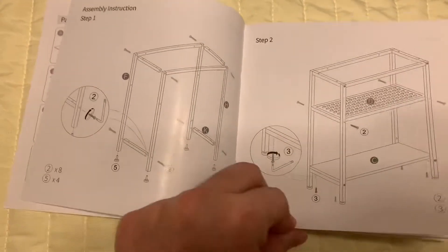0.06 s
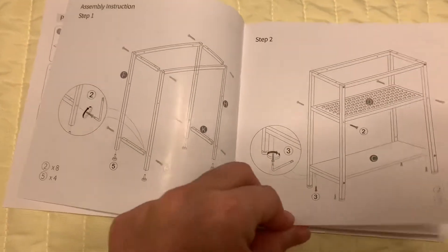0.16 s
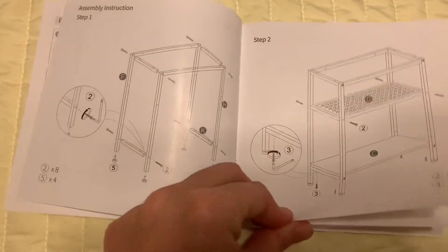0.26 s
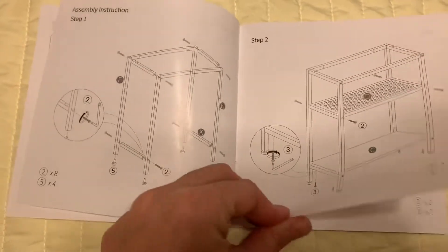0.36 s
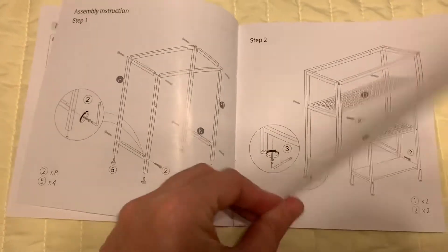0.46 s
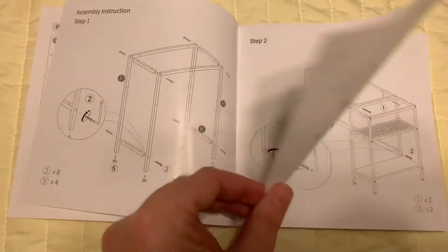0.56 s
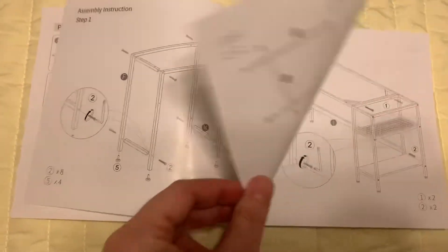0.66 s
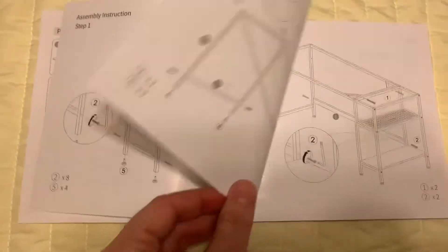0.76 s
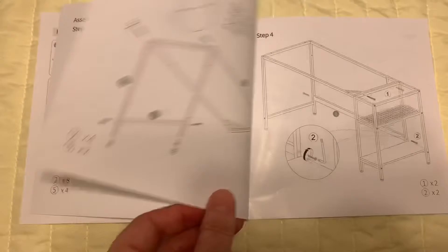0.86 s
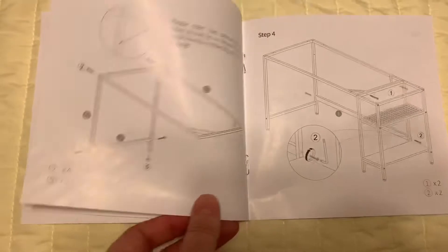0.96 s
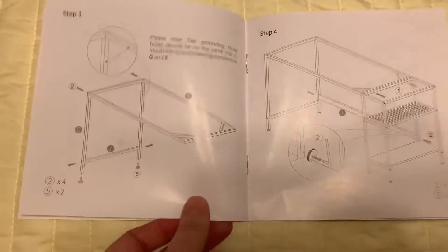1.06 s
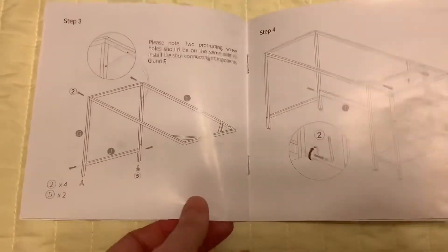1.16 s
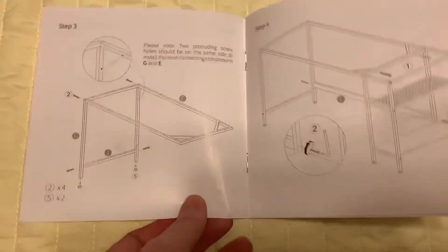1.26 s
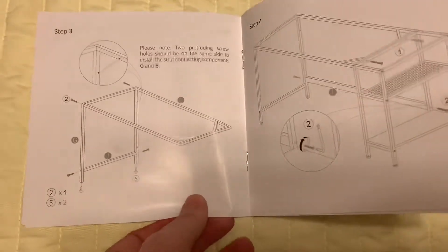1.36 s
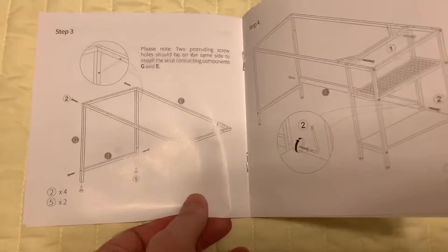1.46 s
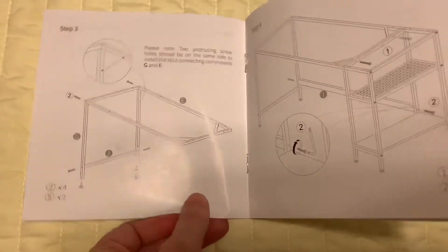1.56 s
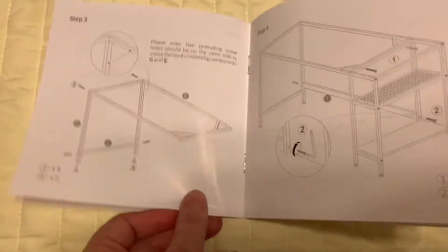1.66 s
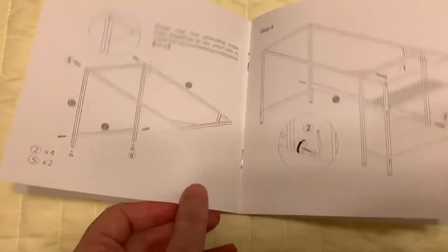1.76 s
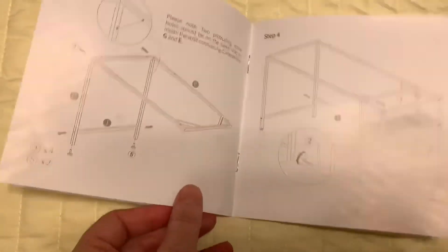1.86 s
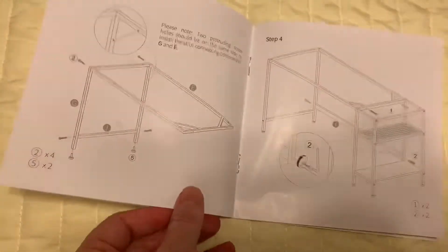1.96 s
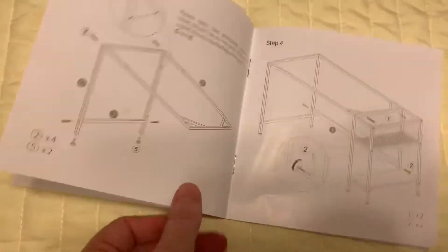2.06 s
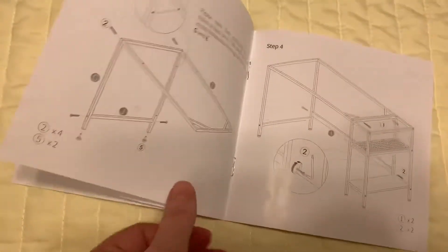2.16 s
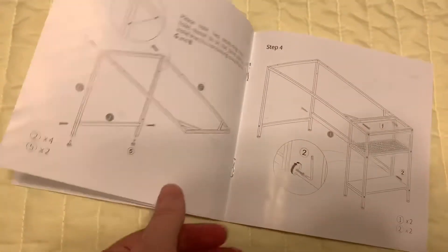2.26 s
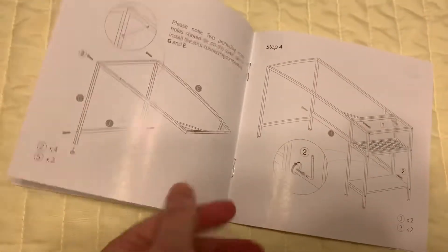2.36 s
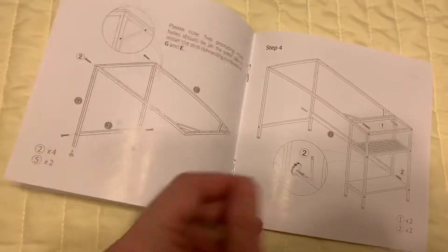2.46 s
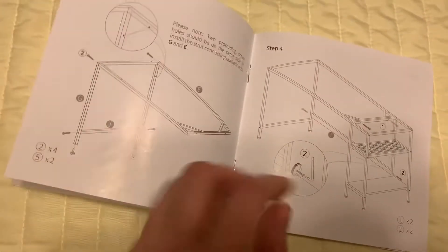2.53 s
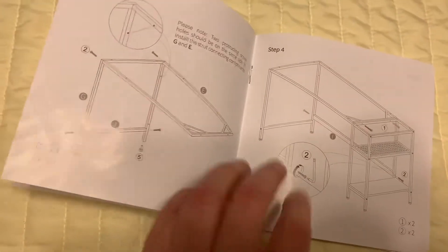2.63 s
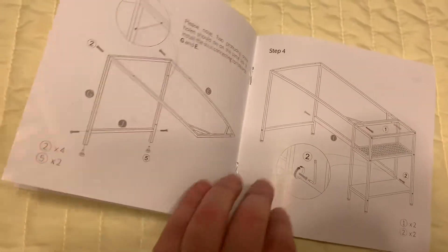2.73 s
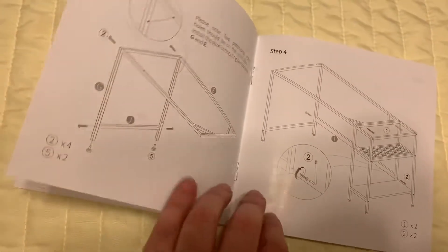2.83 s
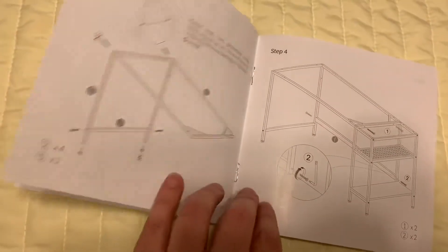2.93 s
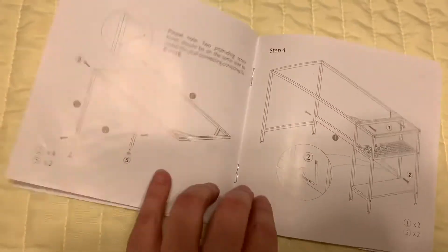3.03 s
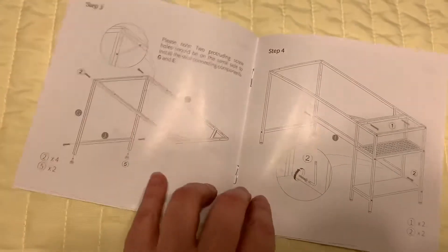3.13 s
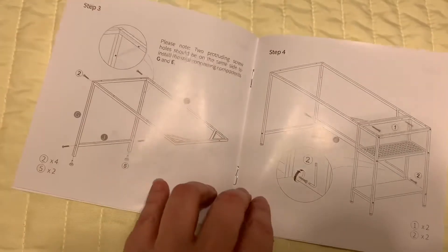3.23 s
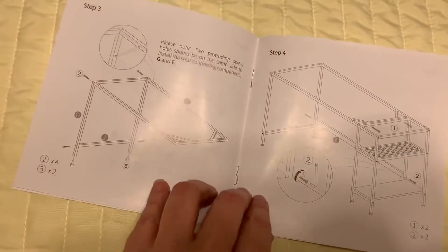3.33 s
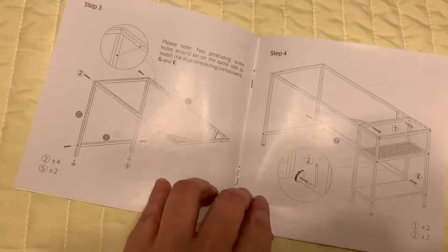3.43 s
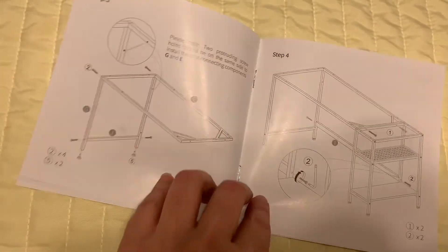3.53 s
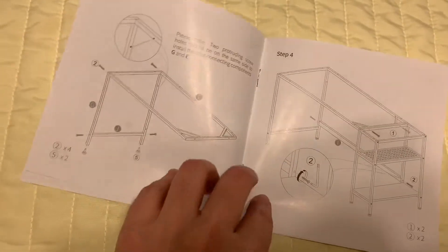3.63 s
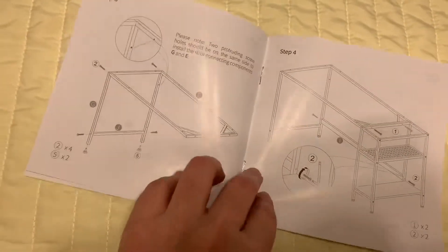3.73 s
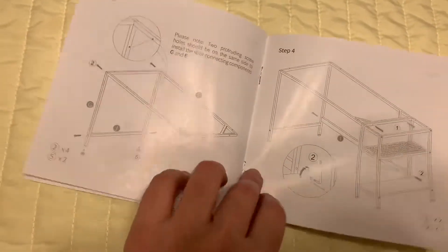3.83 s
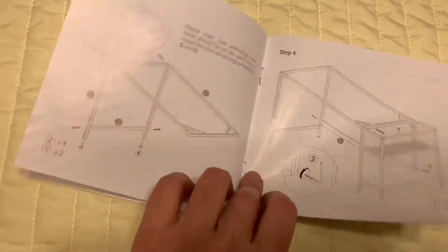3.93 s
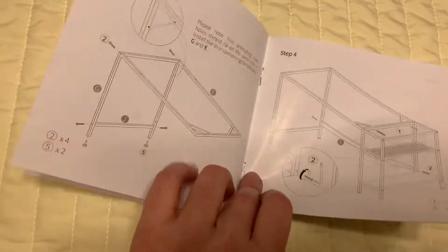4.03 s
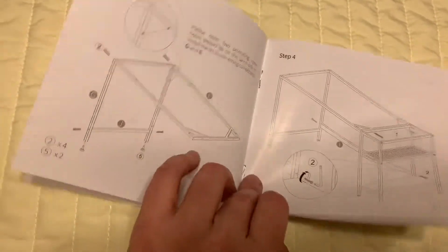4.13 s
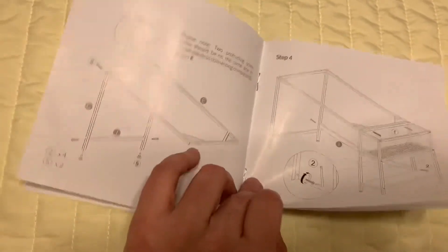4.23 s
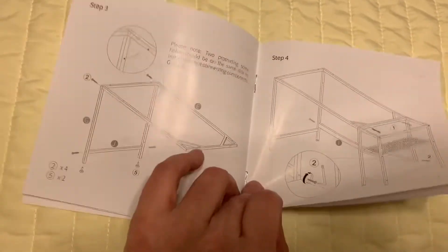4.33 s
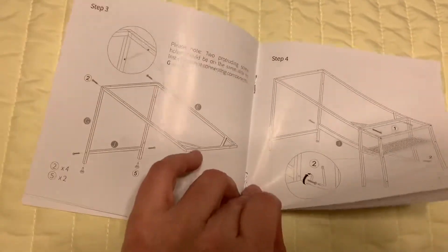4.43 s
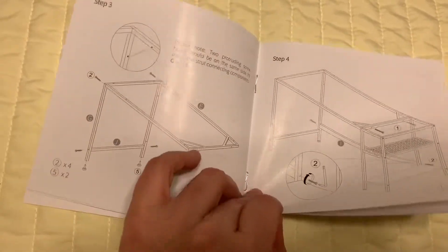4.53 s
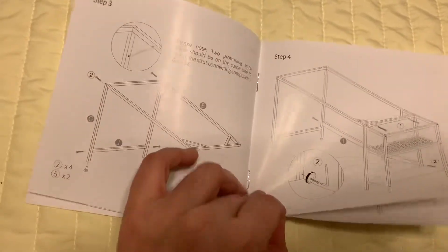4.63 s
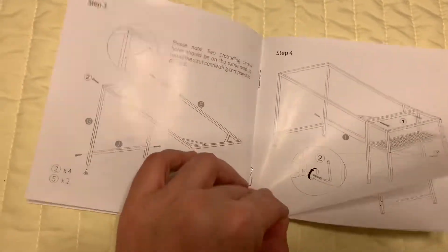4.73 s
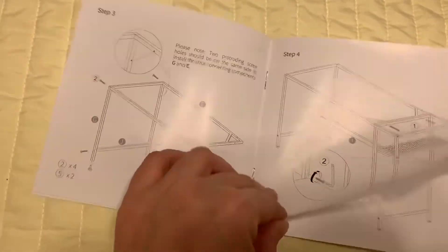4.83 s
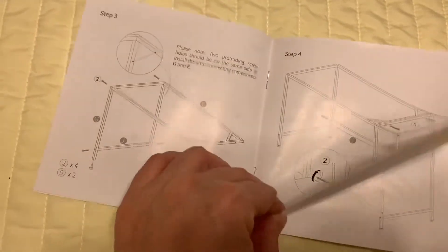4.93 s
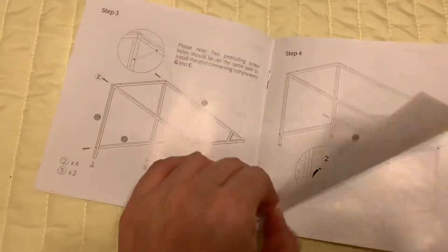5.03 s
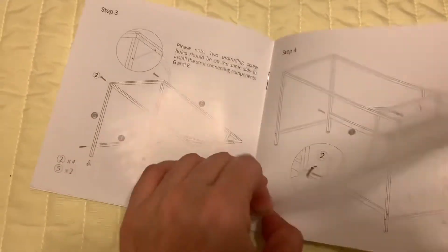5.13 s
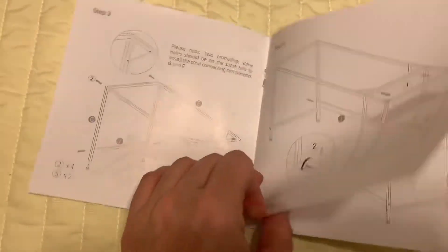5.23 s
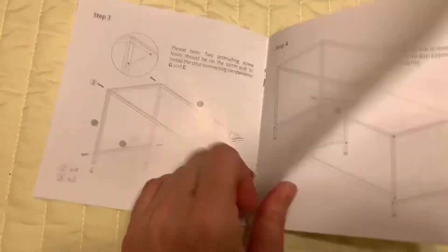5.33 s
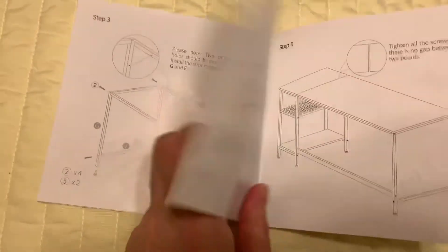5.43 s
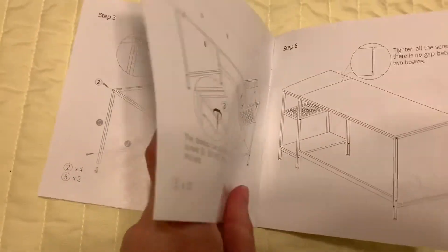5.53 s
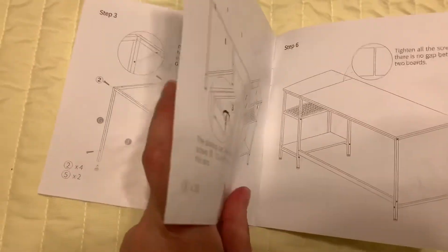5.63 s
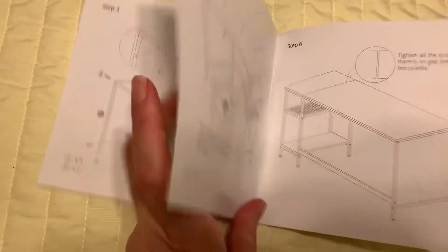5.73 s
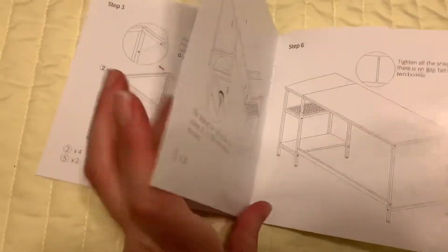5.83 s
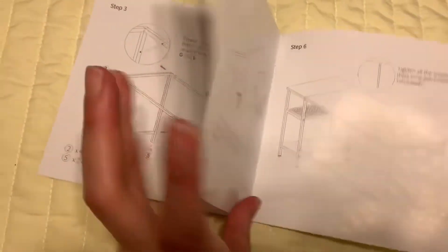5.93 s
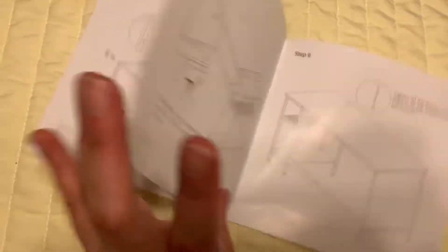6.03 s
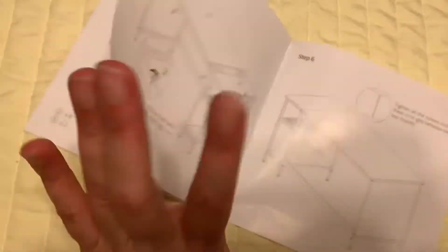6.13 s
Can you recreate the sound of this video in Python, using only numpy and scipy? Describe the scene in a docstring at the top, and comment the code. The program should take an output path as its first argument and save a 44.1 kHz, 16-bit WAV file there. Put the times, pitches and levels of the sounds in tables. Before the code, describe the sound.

A quiet furnished room with a soft low hum and slight hiss; a paper booklet on a quilt is handled very close to a phone microphone. From 0 to 0.4 seconds fingers brush faintly, then at about 0.45-0.8 a sheet rubs, crackles and flaps over, with a crisp tick near 0.9. Light smoothing follows, with a clear snap at 1.5 and a short scuff and buckle around 2.0. From 2.2 to 4.0 it is nearly still, just tiny scrapes and ticks. At about 4.2 the fingers grip the next page: dense dry crackling, with the sharpest snaps at 4.5 and another at 4.7. Around 5.0-5.4 come bright, scratchy swishes and snaps over low papery thumps. Softer, duller flaps and rubs follow from 5.6, with short rustling bursts near 5.9 and 6.0 to the end.

```python
"""Turning the pages of a booklet

A hand turns the pages of a paper booklet on a quilt, close to a two-port phone microphone; a soft room hums.
Sliding sheets are rubbing noise mixed with stick-slip jerks; creases snap as noise bursts with a ringing sine.
Both drive four filtered voices (flap, body, scrape, hiss). Buckles and bumps are low sines sagging in pitch.
"""
import sys
import numpy as np
from scipy import signal
from scipy.fft import rfft, irfft, next_fast_len
from scipy.io import wavfile
from scipy.ndimage import uniform_filter1d, map_coordinates

SR = 44100
rng = np.random.default_rng(int(sys.argv[2]) if len(sys.argv) > 2 else 0)


def inscribe(sig):
    """Save sig as 16-bit PCM at rate SR to the path in sys.argv[1].

    A 1-D sig is mono; a 2-D sig holds one channel per row.
    Samples are clipped to [-1, 1] before scaling.
    """
    pcm = np.round(np.clip(np.atleast_2d(sig).T, -1, 1) * 32767)
    wavfile.write(sys.argv[1], SR, pcm.astype(np.int16))


N = 272979

# Colour of the room tone. Each row: frequency in Hz, relative density in dB per Hz.
ROOM_COLOUR = [(20, -30.5), (40, 17.5), (64, 27.5), (100, 25), (200, 17.5), (400, 6), (1000, -5.5),
               (1500, -8), (2600, -15.5), (4500, -11), (8000, -0.5), (13000, -8.5), (14500, -14.5),
               (16000, -53.5)]
# Colour of the room rumble that swells and sinks. Each row: frequency in Hz, relative density in dB per Hz.
RUMBLE_COLOUR = [(20, -24.5), (40, -6), (64, 1), (95, -14), (200, -38)]
# Colour of the room sound unshared by the ports. Each row: frequency in Hz, relative gain in dB.
APART_COLOUR = [(20, -2.5), (100, 5), (250, -2.5), (1200, 12), (4500, 12.5), (9000, -12.5), (12000, -7.5),
                (16000, -23.5)]
# The two ports. Each row: frequency in Hz, lead of the right port in radians while the left page is held,
# the same for the right page, wander of the lead in radians, right minus left level in dB.
PORT_RESPONSE = [(0, 0, 0, .9, 0), (500, -.4, -.1, .7, .7), (1000, -.5, -.1, .4, .7),
                 (1800, -.8, .1, .45, 1), (2100, -2.2, .5, 1, 2), (2400, -3.1, -.4, .8, 1),
                 (2800, -3.4, -2, 1, 1), (3300, -5, -1, 1.4, .7), (3800, -4.3, -.2, 1.1, 1.5),
                 (4500, -3.2, -.9, 1.2, 2.5), (5000, -3.4, -3.1, .7, 1.5), (6200, -6.3, -6.3, .55, .3),
                 (6700, -6.8, -7.3, .9, 1.2), (7200, -9.4, -9.4, .8, 1.2), (7750, -8.4, -9, 1.5, 1),
                 (8050, -8.3, -9, 1.8, 9.5), (8700, -8.9, -8.9, 1.2, 8), (9500, -8.3, -7.6, 1.3, 5),
                 (10200, -6.3, -6.9, 1, 3), (11000, -5, -4.7, 1.2, 1.5), (11800, -3.1, -3.1, .3, .5),
                 (12500, -1.9, -1.9, .9, .2), (13300, 0, 0, .3, .2), (13900, .1, .1, .8, .2),
                 (14900, 3.1, 3.1, .35, -.5), (16500, 3.5, 3.5, .9, .2)]
# Strokes of the fingers along the sheets. Each row: start of full strength in seconds, swell in seconds,
# hold in seconds, fade in seconds, strength in dB, brightness in dB (added to hiss, taken from flap and body),
# flap over body in dB, scrape over strength in dB, stick-slip share 0-1.
FINGER_STROKES = [(0.0, .05, 0.053, 0.16, -70.5, 0, 0, 1, 0),
                  (0.095, 0.063, 0.19, 0.05, -82.5, 6.5, 17, -11, .1),
                  (0.204, 0.13, 0.014, 0.073, -67, 0.5, -14, 5, 0.5),
                  (0.447, 0.058, 0, 0.056, -64.5, 5.5, 1.5, 4, 0),
                  (0.525, 0.022, 0.019, 0.061, -63, 1, -14, 2, 0.6),
                  (0.608, 0.055, 0.11, 0.16, -55, -3, -15, 0, .7),
                  (0.75, 0.084, .04, 0.01, -60.5, -0.5, -2.5, -22, 0.92),
                  (0.805, .03, 0.048, 0.092, -70, -2, -12, 6.5, 0.05),
                  (0.993, 0.19, 0, 0.084, -68, 4.5, -6, 2, 0.14),
                  (1.147, 0.23, 0.087, 0.48, -71, 7.5, 1, -1, 0),
                  (1.508, 0.068, 0.046, 0.073, -68.5, 3.5, 7.5, 6, 0.9),
                  (1.62, 0.17, 0, 0.21, -68.5, 0, 0.5, -2.5, 0.2),
                  (1.788, 0.044, 0, 0.093, -70, 5, -4, 3.5, 0.5),
                  (1.97, 0.12, 0.0037, 0.06, -65, 3, -16, 4.5, 0.14),
                  (2.014, 0.0099, 0.012, 0.061, -59.5, -7, -5, -3, 0.26),
                  (2.068, 0.077, 0.084, 0.09, -75.5, 6.5, -18, 7.5, 0.44),
                  (2.249, 0.037, 0.063, 0.024, -74.5, 3, -12, -2.5, 0.1),
                  (2.822, 0.025, 0.0063, 0.091, -66, -1, -8, -0.5, 0),
                  (2.87, 0.06, 0.12, .05, -74.5, 5, -23, 6.5, 0.5),
                  (2.99, 0.06, 0.0034, .04, -69.5, 15, -16, -3, 0.82),
                  (3.045, 0.024, 0.037, 0.12, -71, 6, -16, -2.5, 0.56),
                  (3.402, 0.044, 0.098, 0.075, -73.5, 7, -5, -3, 0.3),
                  (3.445, 0.057, 0.04, 0.11, -69, 5, 4, -5, 0.35),
                  (3.534, 0.024, 0.022, 0.22, -63, 0, -9, -6, 0.5),
                  (3.623, 0.074, 0.075, .08, -69, 6, -1, -7, 0.14),
                  (3.748, 0.045, 0.038, .15, -68, 1, -10, -3.5, 0.34),
                  (3.822, 0.054, .06, .05, -71.5, 4, -9, 1, 0.3),
                  (3.901, 0.033, 0.08, 0.013, -68.5, 3.5, 4.5, -3, 0.06),
                  (4.047, 0.024, 0.011, 0.095, -59.5, 1.5, -9.5, -4, 0),
                  (4.145, 0.16, 0.067, 0.059, -69.5, 8, -10, -1.5, 0.09),
                  (4.173, 0.0071, .008, 0.054, -56, -5, -12.5, 3, 0),
                  (4.205, .008, 0.089, 0.033, -54, 2, -21, 2, 0.6),
                  (4.301, 0.0074, 0.047, 0.087, -52, 0.5, -16, -0.5, 0.58),
                  (4.337, 0.071, 0.067, 0.24, -70, -0.5, 13.5, 6, .3),
                  (4.488, 0.014, 0.0062, 0.014, -49.5, -3, -6, 1, 0.05),
                  (4.537, 0.072, 0.025, .1, -64, 3, -2, 13.5, 0.5),
                  (4.583, .04, 0.15, 0.081, -61.5, 0, -3.5, 5, 0.5),
                  (4.731, 0.1, 0, 0.16, -55, 1, -0.5, 2, 0.24),
                  (4.87, 0.021, 0.048, 0.045, -74.5, -7.5, 5, -28, 0.2),
                  (4.972, 0.018, .05, 0.17, -61.5, 1.5, -12, -1, 0.1),
                  (5.065, 0.05, 0.085, 0.12, -52, -1.5, -6.5, 4.5, .3),
                  (5.179, 0.066, 0.023, 0.013, -55, 8.5, -20, 8.5, 0.22),
                  (5.259, 0.022, 0.011, 0.043, -48, 5.5, -1.5, -4, 0),
                  (5.317, .05, 0.057, 0.045, -64, -2.5, -3, -6, 0.3),
                  (5.397, 0.022, 0.026, 0.044, -50, -7, -11.5, -9, 0.05),
                  (5.517, 0.11, 0, 0.073, -64, 1, 0, -5.5, 0.1),
                  (5.642, 0.026, 0.018, 0.18, -53.5, -0.5, -6, -8.5, 0.1),
                  (5.782, 0.0079, 0.0011, 0.02, -57, -14.5, -17, -15, 0.04),
                  (5.8, 0.032, 0.026, .05, -75, -10.5, -1.5, -12, 0.2),
                  (5.878, 0.041, 0.011, 0.02, -58.5, -6, -10, -9, 0.04),
                  (5.911, 0.0078, 0.026, 0.045, -49, -8.5, -15.5, -0.5, 0.16),
                  (5.942, 0.087, 0.041, 0.083, -59, 2.5, 3.5, -4, 0),
                  (6.018, 0.016, 0.011, 0.029, -48, -5.5, -8, -1, 0.18),
                  (6.076, 0.024, 0.016, 0.039, -59, -2.5, 0, -10, 0.2),
                  (6.126, 0.021, 0, 0.037, -51.5, 0, -17, 1, 0.17),
                  (6.188, 0.015, 0, .05, -59.5, -4.5, 1.5, -3, 0.3)]
# Typical stick-slip jerks per second under the fingers: on the left page, on the right page.
SLIP_RATES_PER_S = [115, 200]
# Creases and page edges that let go. Each row: nominal time in seconds, relative level in dB,
# sheet pitch in Hz, relative body level in dB, relative hiss level in dB, crease decay t60 in seconds.
CREASE_SNAPS = [(0.0154, -44.5, 1230, -30, -5.5, 0.017), (0.2112, -42, 990, -10.5, -2.5, 0.027),
                (0.4434, -48, 1050, -10, -17, 0.065), (0.5205, -49.5, 1290, -17, -5, 0.0095),
                (0.602, -44, 1230, -11, -6, 0.036), (0.6157, -38, 860, -2.5, -8, 0.012),
                (0.6282, -45.5, 700, 3, -6, 0.013), (0.6372, -43.5, 850, 3.5, -21, 0.026),
                (0.6475, -42, 630, 3.5, -21, .0047), (0.6672, -47, 746, 2, -8, .008),
                (0.6924, -52, 674, 6, -3, 0.022), (0.7164, -52, 890, 12.5, 8.5, 0.0093),
                (0.7284, -54.5, 760, 6, -6, .014), (0.7783, -51.5, 1100, 5.5, -5, 0.0098),
                (0.7896, -51.5, 900, 7, -6, .008), (0.9175, -34.5, 2150, -21.5, -9.5, 0.015),
                (0.9852, -45, 950, -6.5, -0.5, 0.014), (1.07, -68.5, 926, 16.5, 0, 0.013),
                (1.345, -43.5, 1430, -6, 1.5, 0.0077), (1.5061, -27, 1374, -5.5, -17, 0.019),
                (1.6082, -61, 740, 6, 15.5, 0.01), (1.8836, -62.5, 1420, -13, 4, 0.042),
                (1.9586, -40, 1880, -11.5, -11.5, 0.014), (1.991, -42, 1960, -6, -3, 0.036),
                (2.0094, -43.5, 1450, -9.5, -4, 0.039), (2.2904, -58, 1830, 1, 5, 0.0077),
                (2.7364, -62.5, 1690, -7, -12, 0.024), (2.8121, -64, 790, 4.5, -1, 0.02),
                (2.9847, -58, 1050, -34, 3, 0.0094), (3.1203, -65, 1160, -8.5, -5, 0.021),
                (3.3918, -53.5, 1010, -1.5, 7, 0.0036), (3.4464, -59, 670, 1, 1, .012),
                (3.475, -53.5, 1010, -3, 5, 0.01), (3.6292, -68.5, 1430, -8, 23, .01),
                (3.6661, -59, 1200, 3.5, 13, 0.0081), (3.683, -66, 1140, 8, 11, 0.011),
                (3.709, -65, 1320, 5, 17.5, 0.0069), (3.7831, -53, 1510, -2, -18, 0.012),
                (3.9024, -65, 660, 7.5, -8, 0.053), (4.2067, -40, 1580, -11, -26, 0.057),
                (4.2181, -33.5, 1580, -10.5, -20, 0.019), (4.274, -35.5, 1410, -4.5, -3, 0.0032),
                (4.2868, -41.5, 1000, 0, -5, 0.0071), (4.2964, -37.5, 1560, -6, -0.5, 0.013),
                (4.3118, -41, 1464, -3, 3, 0.012), (4.35, -44, 985, -22, 0, .027),
                (4.403, -43.5, 2050, -6, 3.5, 0.017), (4.4146, -50, 593, -17.5, 5, .014),
                (4.429, -44.5, 1160, -14, 5, .007), (4.4455, -54, 1130, 6, 17.5, 0.0056),
                (4.4642, -42.5, 1110, -27, -1.5, 0.011), (4.4804, -23, 1910, -26, -16.5, 0.017),
                (4.517, -41, 1350, -18, -6, 0.038), (4.5271, -13.5, 1390, -12.5, -26, 0.014),
                (4.5845, -37.5, 1170, -15, -5, 0.021), (4.61, -34.5, 970, -9, -3.5, 0.016),
                (4.6365, -36.5, 1910, -7.5, -3, 0.018), (4.661, -36, 1200, -22, -4.5, 0.0099),
                (4.6816, -42.5, 2000, -4, -19, 0.016), (4.7019, -39.5, 1090, -11, -15, 0.046),
                (4.7294, -25, 1400, -13, -10, 0.028), (4.7683, -39.5, 1370, -20, -4.5, 0.023),
                (4.8281, -45.5, 1470, -5.5, 3, 0.0092), (4.8697, -53, 925, 8, 3.5, 0.0075),
                (4.9664, -56, 1990, -1, 6, 0.01), (5.0238, -23, 1380, -15, -8, 0.0056),
                (5.038, -37, 955, 5.5, -22, 0.0096), (5.0554, -30.5, 1380, -17, -7, 0.016),
                (5.1034, -27.5, 1150, -1, -31, 0.0084), (5.2938, -52, 1190, 7.5, 6, 0.013),
                (5.3965, -45.5, 994, 11, -9, 0.018), (5.4547, -50.5, 678, 0, 5, .022),
                (5.515, -61.5, 1210, 15.5, -4, 0.0092), (5.6301, -46.5, 835, 9.5, 1.5, 0.01),
                (5.6384, -49.5, 1387, 9.5, 10.5, .0047), (5.706, -63.5, 1322, 12, -12, 0.07),
                (5.911, -44, 1260, 7, -17, 0.016), (5.927, -34.5, 1120, -7.5, -28, 0.024),
                (6.0247, -43, 1260, 1, 5, 0.012), (6.0814, -65, 1030, 21, -5, 0.017)]
# The page buckles and the booklet bumps the quilt. Each row: start in seconds, relative level in dB,
# starting pitch in Hz.
BUCKLE_THUMPS = [(0.451, -51.5, 134), (0.63, -50, 301), (0.666, -47, 297), (0.698, -49, 358),
                 (0.716, -43.5, 302), (0.987, -50.5, 138), (1.07, -55.5, 264), (1.505, -43, 346),
                 (1.548, -55, 195), (1.606, -50.5, 253), (2.012, -38.5, 445), (2.819, -60, 260),
                 (2.881, -56, 143), (3.473, -53.5, 213), (3.693, -51.5, 272), (3.902, -52, 460),
                 (4.274, -48, 465), (4.337, -44.5, 266), (4.359, -41, 348), (4.383, -49, 334),
                 (4.407, -43, 149), (4.432, -42.5, 157), (4.459, -49, 110), (4.608, -49, 254),
                 (4.729, -37, 243), (4.758, -43.5, 173), (4.869, -47.5, 312), (5.038, -36, 263),
                 (5.097, -37, 210), (5.131, -41, 269), (5.158, -48.5, 116), (5.26, -60, 264),
                 (5.349, -48, 257), (5.417, -47.5, 177), (5.513, -51, 299), (5.633, -39.5, 269),
                 (5.703, -49.5, 152), (5.778, -52, 302), (6.018, -40.5, 430), (6.074, -48, 444)]
# Colours of the sheet's four voices. Each row: frequency in Hz, relative density in dB per Hz.
FLAP_COLOUR = [(15, -68), (30, -21), (60, -8), (100, -8), (160, -4), (230, -6), (330, -4.5), (500, -7),
               (900, -13.5), (2000, -51)]
BODY_COLOUR = [(120, -67.5), (300, -54), (600, -1), (800, 4.5), (1000, 7.5), (1350, 3), (1600, 2),
               (2000, -2.5), (3000, -6), (6000, -64)]
SCRAPE_COLOUR = [(600, -70), (1300, -1), (2300, -2.5), (2900, -2), (3700, -3.5), (4500, -3.5),
                 (5500, -10.5), (6800, -16), (9000, -52), (14000, -54)]
HISS_COLOUR = [(2500, -40.5), (5000, -1.5), (7400, -2.5), (8100, 7), (9000, 5.5), (10500, -4),
               (12500, -5.5), (14200, -7), (15300, -17), (16500, -34.5)]
# Body of the right page, stiffer when pinched. Each row: frequency in Hz, relative density in dB per Hz.
TAUT_BODY_COLOUR = [(120, -66.5), (300, -50.5), (600, -6), (800, 3.5), (1000, 6), (1350, 6), (1600, 1),
                    (2100, -2.5), (3000, -24.5), (6000, -69)]

GRIP_S = 4.1  # the hand takes hold of the right page
ROOM_GAIN_DB = -70.5
TOP_HZ = 16300
FLAP_JERK = 0.47  # the heavy flap follows the jerks only in part
STROKE_SPAN_DB = 20  # gained over a swell, lost over a fade
# flap under the body of a soft snap at 1 kHz; a lower sheet flaps more; dB lost per dB above SOFT_SNAP_DB
SNAP_FLAP_DB, FLAP_PER_OCTAVE_DB, FLAP_LAG, SOFT_SNAP_DB = -12, -4, 0.9, -50
CREEP_S, CREEP_PER_T60 = 0.00036, 0.032  # creep before a snap: base time, and more for long snaps
THUMP_T60_S, THUMP_DAMPING = 0.04, 0.1  # at 250 Hz; higher buckles die sooner by this power of the pitch


def amp(db):
    """Gain of a level in dB."""
    return 10 ** (np.asarray(db) / 20)


def unit(x):
    """x at rms 1."""
    return x / np.sqrt(np.mean(x ** 2) + 1e-20)


def wobble(knots_per_s):
    """A smooth random curve through normally distributed knots."""
    knots = rng.standard_normal(int(N * knots_per_s / SR) + 4)
    return map_coordinates(knots, [np.arange(N) * knots_per_s / SR])


def coloured(x, points):
    """x through a causal minimum-phase filter of the (Hz, dB) colour; white noise keeps its power."""
    m = 2 * next_fast_len(N // 2 + 4096)
    hz, db = np.transpose(points)
    log_hz = np.log(np.fft.rfftfreq(m, 1 / SR) + 1)
    log_gain = np.interp(log_hz, np.log(hz), db) * np.log(10) / 20
    # folding the cepstrum gives the minimum phase
    cepstrum = irfft(log_gain, m)
    cepstrum[1:m // 2] *= 2
    cepstrum[m // 2 + 1:] = 0
    phase = rfft(cepstrum).imag
    response = unit(np.exp(log_gain)) * np.exp(1j * phase)
    return irfft(rfft(x, m) * response, m)[..., :N]


def room():
    """Distant rumble and faint hiss, partly different at the two ports."""
    steady = unit(coloured(rng.standard_normal((3, N)), ROOM_COLOUR))
    rumble_gain = amp(2.1 * wobble(6) - 4.5)
    rumble = rumble_gain * coloured(rng.standard_normal((3, N)), RUMBLE_COLOUR)
    shared, *apart = steady + rumble
    apart = coloured(np.array(apart), APART_COLOUR)
    return amp(ROOM_GAIN_DB) * (0.76 * ports(shared, wander=1.0) + 0.6 * apart)


def strokes():
    """Stroke powers add in each voice; the stick-slip share is weighted by scrape power."""
    t = np.arange(0, N + 32, 32) / SR
    power, jerky_power = np.full((4, len(t)), 1e-12), 0
    for s, swell_s, hold_s, fade_s, db, bright_db, flap_db, scrape_db, share in FINGER_STROKES:
        before = np.maximum(s - t, 0) / swell_s
        after = np.maximum(t - s - hold_s, 0) / fade_s
        shape = amp(-2 * STROKE_SPAN_DB * (before + after))  # a power, hence the 2
        voices_db = db + np.array([flap_db - bright_db, -bright_db, scrape_db, bright_db])
        power = power + amp(2 * voices_db)[:, None] * shape
        jerky_power = jerky_power + share * amp(2 * voices_db[2]) * shape
    curves = (*np.sqrt(power), jerky_power / power[2])
    *levels, share = [np.interp(np.arange(N) / SR, t, c) for c in curves]
    return np.array(levels), share


def slips(scatter, size_db, t60_s, creep_s, click):
    """Stick-slip jerks, unevenly spaced and unequal: each a click with a fast-dying puff of noise."""
    page_rate = np.where(np.arange(N) < GRIP_S * SR, *SLIP_RATES_PER_S)
    rate = page_rate * amp(2.2 * wobble(7))
    even = np.flatnonzero(np.diff(np.floor(np.cumsum(rate) / SR)))
    chance = rng.standard_normal((N, 2))[:len(even)]
    shift = scatter * SR / rate[even] * chance[:, 0]
    at = np.clip(even + shift, 0, N - 1).astype(int)
    jerks = np.bincount(at, amp(size_db * chance[:, 1]), N)
    t = np.arange(-(SR // 100), SR // 100) / SR
    creep = np.exp(np.minimum(t, 0) / creep_s)
    puff = np.where(t < 0, creep, amp(-60 * t / t60_s))
    puffs = np.convolve(jerks, puff, 'same') * rng.standard_normal((4, N))
    return unit(click * unit(jerks) + unit(puffs))


def sliding():
    """Friction drive of the four voices: smooth rubbing mixed with jerks, fluttering in level."""
    levels, share = strokes()
    share = share * [[FLAP_JERK], [1], [1], [1]]
    jerks = slips(scatter=.13, size_db=2.8, t60_s=.007, creep_s=.0007, click=1.3)
    rubbing = rng.standard_normal((4, N))
    grain = np.sqrt(1 - share) * rubbing + np.sqrt(share) * jerks
    own_flutter = np.array([wobble(30) for _ in levels])
    return grain * levels * amp(1.45 * wobble(45) + 0.63 * own_flutter)


def snapping():
    """Each snap sends a click and a noise burst into the four voices and rings the bent sheet at its pitch."""
    drive, ring, lead = np.zeros((4, N + SR)), np.zeros(N + SR), SR // 50
    t = np.arange(-lead, SR // 5) / SR
    for s, db, hz, body_db, hiss_db, t60_s in CREASE_SNAPS:
        loudness_db = db + body_db - SOFT_SNAP_DB
        flap_db = body_db + SNAP_FLAP_DB + FLAP_PER_OCTAVE_DB * np.log2(hz / 1e3) - FLAP_LAG * loudness_db
        at = round((s + 0.00099) * SR)
        # the crease creeps before it lets go
        creep = np.exp(np.minimum(t, 0) / (CREEP_S + CREEP_PER_T60 * t60_s))
        fast = creep * amp(-60 * np.maximum(t, 0) / t60_s)
        slow = creep * amp(-60 * np.maximum(t, 0) / (3.0 * t60_s))  # the wide sheet swings longer
        shapes = np.array([slow, fast + 0.053 * slow, fast, fast])
        burst = 0.52 * shapes * rng.standard_normal(shapes.shape)
        burst[:, lead] = .6 * np.linalg.norm(shapes, axis=1)  # the click
        voices_db = db + np.array([[flap_db], [body_db + 1.5], [-4], [hiss_db - 0.5]])
        drive[:, at:at + len(t)] += amp(voices_db) * burst
        ring[at:at + len(t)] += amp(db + body_db + 4.0) * fast * np.sin(2 * np.pi * hz * t)
    return drive[:, lead:lead + N], ring[lead:lead + N]


def thumps():
    """One soft low swing for each buckle or bump, sagging in pitch."""
    out, t = np.zeros(N + SR), np.arange(SR // 5) / SR
    for s, db, hz in BUCKLE_THUMPS:
        swing = np.sin(2 * np.pi * hz * t * (1 - 2.8 * np.minimum(t, .04)))
        decay_db = -60 * t * (hz / 250) ** THUMP_DAMPING / THUMP_T60_S
        onset = 1 - np.exp(-t / 0.002)
        out[round(s * SR):][:len(t)] += amp(db + 3.0 + decay_db) * onset * swing
    return out[:N]


def paper():
    """Rubbing and snaps through the colour of each voice, over the thumps."""
    bursts, ring = snapping()
    flap, body, scrape, hiss = sliding() + bursts
    taut = np.arange(N) >= GRIP_S * SR
    body = coloured(body * ~taut, BODY_COLOUR) + coloured(body * taut, TAUT_BODY_COLOUR)
    flap = coloured(flap, FLAP_COLOUR)
    scrape = coloured(scrape, SCRAPE_COLOUR)
    hiss = coloured(hiss, HISS_COLOUR)
    return ring + thumps() + body + flap + scrape + hiss


def walls(x):
    """A short answer from a furnished room: decaying noise convolved with the sound."""
    t = np.arange(SR // 5) / SR
    tail = rng.standard_normal(len(t)) * amp(-60 * t / 0.1) * (t > .003)
    return signal.fftconvolve(x, tail / np.linalg.norm(tail))[:N]


def ports(x, wander):
    """Two ports hear one sound; the phase lead between them depends on the page held and drifts."""
    hz, t, z = signal.stft(x, SR, nperseg=256, noverlap=192)
    port_hz, *columns = np.transpose(PORT_RESPONSE)
    left_page, right_page, spread, db = [np.interp(hz, port_hz, c)[:, None] for c in columns]
    drift = rng.standard_normal(z.shape)
    for size, axis in ((4, 0), (16, 1), (16, 1)):  # smooth over frequency, then twice over time
        drift = uniform_filter1d(drift, size=size, axis=axis)
    lead = np.where(t < GRIP_S, left_page, right_page) + wander * spread * unit(drift)
    half = amp(db / 2) * np.exp(.5j * lead)  # each port takes half the difference
    return signal.istft(np.array([z / half, z * half]), SR, nperseg=256, noverlap=192)[1][:, :N]


def scene():
    """Pages and their echo reach the two ports over the room tone."""
    pages = paper()
    return ports(pages + amp(-15) * walls(pages), wander=1.0) + room()


def record(dry):
    """The phone keeps nothing above its band limit."""
    m = next_fast_len(N)
    passband = np.fft.rfftfreq(m, 1 / SR) < TOP_HZ
    return irfft(rfft(dry, m) * passband, m)[:, :N]


dry = scene()
out = record(dry)
inscribe(out)
```